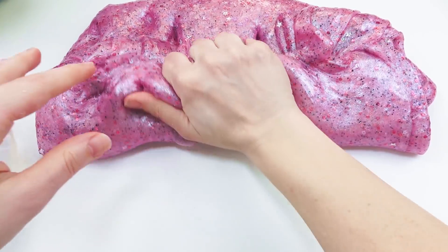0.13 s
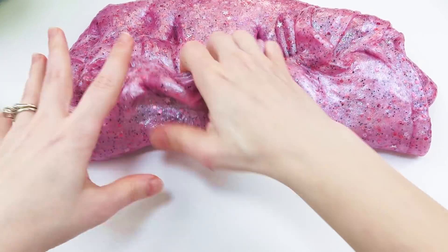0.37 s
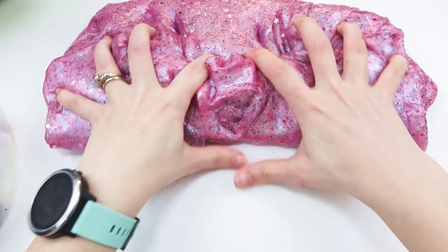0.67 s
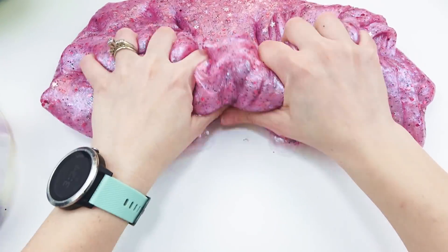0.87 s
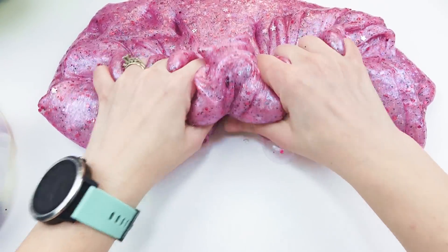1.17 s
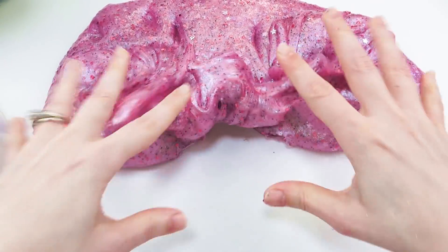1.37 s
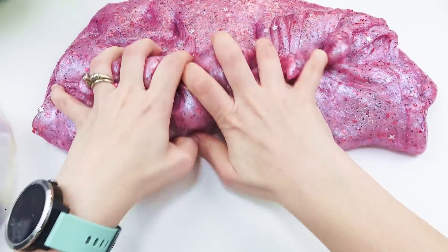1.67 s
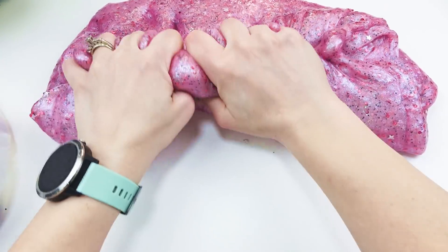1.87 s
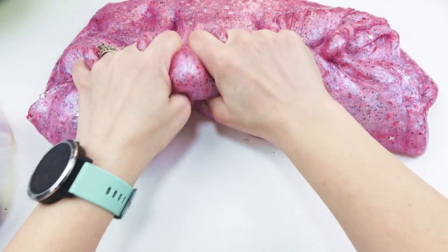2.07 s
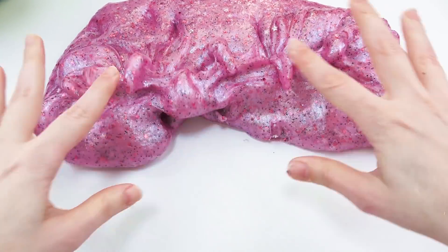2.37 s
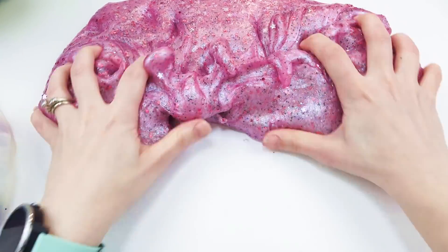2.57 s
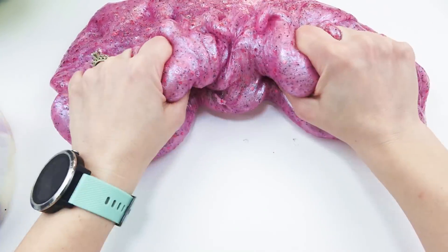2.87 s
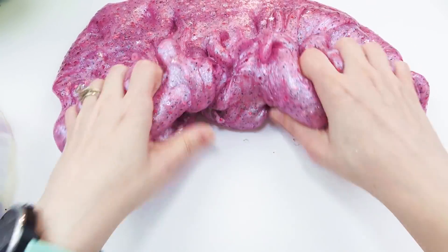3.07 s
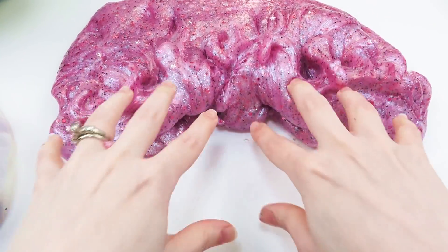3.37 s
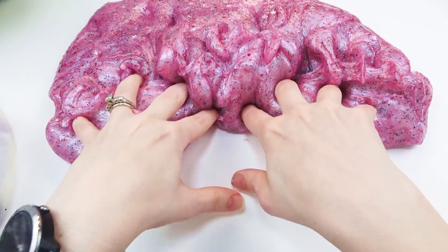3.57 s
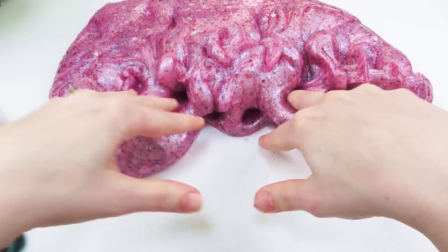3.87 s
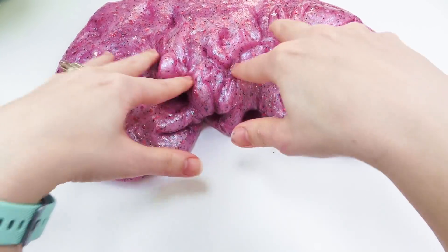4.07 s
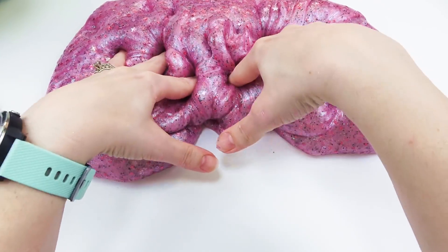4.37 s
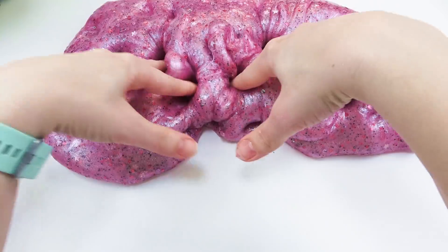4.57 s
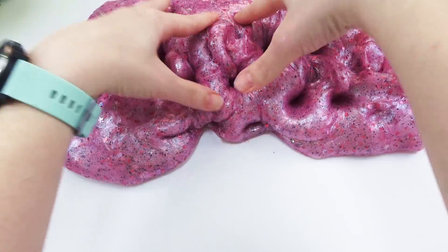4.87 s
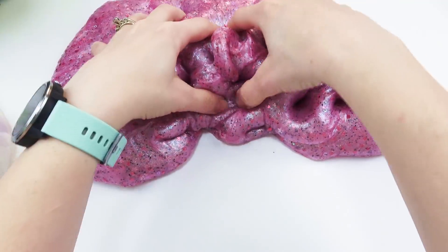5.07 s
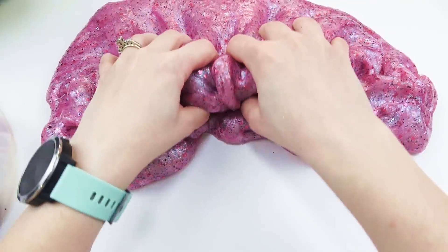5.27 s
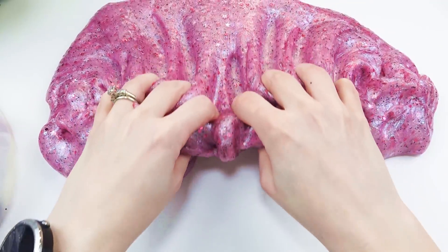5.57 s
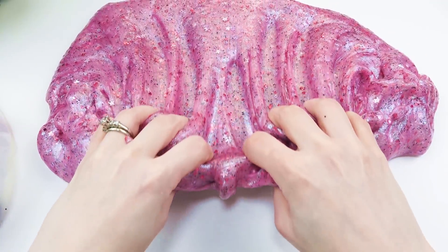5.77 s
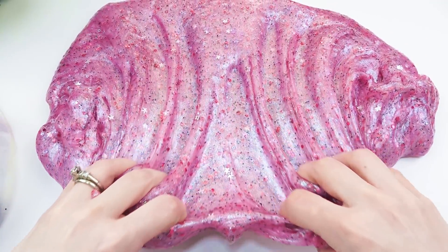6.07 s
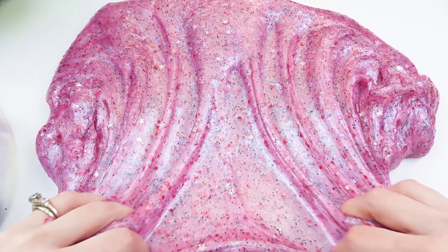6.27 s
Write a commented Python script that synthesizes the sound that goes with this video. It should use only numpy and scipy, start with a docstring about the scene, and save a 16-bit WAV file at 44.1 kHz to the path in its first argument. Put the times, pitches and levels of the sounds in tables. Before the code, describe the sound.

Close stereo microphone, small room with a very short reverberation; a low fan rumble, faint hiss and wavering mains hum continue throughout. At 0.15 s a strong hollow bubble pop bursts with a small air squirt and soft table thud, followed by tiny bright clicks and a sticky crackle near 0.4 s. From 0.7 to 2.3 s, short peeling crackles come and go, with a sharp tick near 0.97, a wet pop and fluttering squirt at 1.7 and dull palm bumps. A crisp pop hits at 2.67; gooey crackling and a squirt follow at 3.1-3.25. A bright, loud snap at 3.59 leads to the strongest cluster of snaps and crackle at 3.88-3.97. Another pop group and thud come at 4.63-4.67. Afterwards there are sparse light clicks, faint crackling around 5.2-5.5, a small pop at 5.97 and near quiet until 6.4.

```python
"""In a small room, two hands knead thick slime on a table, close to a stereo microphone.
Trapped air bubbles burst as damped cavity rings with noisy film snaps, and folds squirt as fluttering air.
The sticky skin crackles as it peels off the fingers: random ruptures and swarms of tiny ringing cells.
Soft pushes ring the table's decaying low modes; behind run filtered fan noise and wavering hum tones."""
import sys
import numpy as np
from scipy import signal
from scipy.fft import rfft, irfft, next_fast_len
from scipy.io import wavfile
from scipy.ndimage import uniform_filter1d

SR = 44100
rng = np.random.default_rng(int(sys.argv[2]) if len(sys.argv) > 2 else 0)


def to_wav(s):
    """Save 16-bit WAV."""
    ch = np.atleast_2d(s).T  # columns
    pcm = np.round(np.clip(ch, -1, 1) * 32767)  # PCM
    wavfile.write(sys.argv[1], SR, pcm.astype(np.int16))


N = 284004
TIME = np.arange(N) / SR

# larger bursting bubbles: (time [s], relative level [dB], cavity pitch [Hz],
# relative level of the film's snap [dB], left minus right [dB])
POPS = [(0.1448, 3, 1105, -30.5, 1.5), (0.1446, -7, 530, -53, 0), (.2302, -24.5, 1980, -28, 4),
        (.2838, -14, 9700, -53, -3.5), (0.2858, -17.5, 10800, -54, 2), (0.4034, -29, 10500, -33, 5),
        (.423, -25, 1240, -55, 0), (.6629, -30, 11200, -37.5, 4), (.686, -31, 2250, -44.5, 1),
        (.7398, -29.5, 2680, -53, 1), (.7538, -27.5, 10430, -43, 7), (0.9656, -26, 12100, -30.5, -1),
        (0.97, -14, 12420, -53, 0), (1.0091, -23, 6840, -34.5, -1), (1.2633, -21, 2930, -45, 2),
        (1.6813, -15.5, 3070, -26, 3.5), (1.9384, -26, 4470, -41, 0), (2.0405, -36.5, 4470, -54, 0),
        (2.672, -9, 6300, -23, 2.5), (3.124, -20.5, 686, -50, 1), (3.1508, -31, 9000, -36, 5),
        (3.263, -29, 12000, -43, 3), (3.54, -37.5, 1620, -53, 3), (3.56, -41, 1470, -45, 1.5),
        (3.588, -0.5, 11200, -48, 3), (3.5878, -8, 9600, -51, 0.5), (3.5883, -25.5, 3380, -61, 0),
        (3.7194, -41, 12000, -54, 4), (3.8756, -22, 9250, -31.5, 2.5), (3.89, 2.5, 9600, -13.5, 4.5),
        (3.8901, -12, 4040, -44, -5), (3.9333, -10, 10940, -23, 3), (3.942, -9.5, 10000, -20.5, 1),
        (3.9437, -14, 10400, -21, 2), (3.9672, -38, 810, -44, 0), (4.2915, -26, 14040, -65, -1),
        (4.6295, -13, 8510, -32.5, 5), (4.631, -15.5, 6340, -23, 0), (4.6427, -27.5, 7650, -29, -2),
        (4.9471, -18, 13780, -46.5, 3), (5.136, -21, 7270, -50, 1.5), (5.1417, -19.5, 6800, -37, 0),
        (5.1557, -22, 11500, -39, 8), (5.2503, -35, 1490, -52, 3), (5.2665, -38, 12000, -50, 5),
        (5.449, -33.5, 6800, -53.5, 2), (5.5626, -28, 8610, -51, 4.5), (5.5911, -19, 6150, -33, 2),
        (5.7977, -28, 11210, -57, 3.5), (5.9736, -17.5, 2890, -34, 2.5), (5.974, -23.5, 1101, -54, 2),
        (6.133, -46, 5480, -51, 3), (6.2643, -43, 1600, -51, 0), (6.4082, -30.5, 4770, -48.5, 5)]
# air forced out through a fold: (time [s], length [s], relative level [dB], pitch of the fold [Hz])
SQUIRTS = [(.148, 0.0079, -46, 850), (.2315, 0.013, -47.5, 13000), (1.689, 0.012, -37, 3500),
           (1.699, 0.019, -38, 2300), (3.124, 0.015, -48.5, 1860), (3.143, 0.016, -51, 15000),
           (4.672, 0.016, -50, 333), (3.964, 0.0074, -44.5, 1630), (.906, 0.01, -55.5, 5600),
           (3.1, 0.026, -66.5, 4200), (2.683, 0.006, -58, 6700)]
# palms load or release the table: (time [s], relative level [dB])
THUDS = [(0.1451, -43.5), (0.214, -54), (0.406, -45.5), (0.736, -39.5), (1.368, -41.5), (1.686, -39),
         (2.248, -41.5), (2.309, -44), (3.148, -37.5), (3.271, -42), (3.88, -38.5), (3.973, -36.5),
         (4.673, -33.5)]
# a hand grips, drags or lifts and the slime peels: (time [s], length [s], relative crackle level [dB],
# fade over the length [dB], large cells relative to small [dB], fine threads relative to small cells [dB])
PEELS = [(0.146, 0.029, -60, -1, 6, 3), (0.242, .012, -56.5, 11, 4, 2), (0.293, .03, -72, 6, -4, 12),
         (0.394, .11, -53, 11.5, -5, 3.5), (0.739, 0.086, -65.5, 0, -2, -0.5),
         (0.859, 0.2, -60, 1.5, -7, 1), (1.272, .17, -51, 5.5, -5.5, 0), (1.717, 0.04, -57.5, 5, 2, -6),
         (1.801, 0.22, -70, -0.5, -9, 4), (1.932, .02, -60, 0.5, -9, -1), (2.198, 0.035, -59, -4, -2.5, 4),
         (2.246, 0.079, -50.5, 3, -4.5, 1.5), (2.508, 0.01, -64.5, -4.5, -0.5, 5),
         (2.708, 0.071, -65, 0, -9, 2), (2.782, .07, -58.5, 2, -13, -2.5), (2.898, .08, -74, 6, -6, 1),
         (3.126, .06, -49, 3.5, -4, -2.5), (3.209, 0.035, -52.5, 3.5, -5, 3.5),
         (3.901, 0.071, -50, 2, -2, 0.5), (4.632, 0.042, -56, -2.5, 0, 4), (5.15, 0.11, -71, 12, 0.5, 9.5),
         (5.269, 0.29, -73, 6, 1.5, 2), (5.593, 0.022, -69, 0.5, -6, 6), (6.384, 0.058, -67.5, -1, -2, 4.5)]
# resonant modes of the table: (frequency [Hz], relative level [dB], 60 dB decay time [s])
TABLE_MODES = [(86.5, -1.5, 0.13), (98.2, -1, .25), (136, -4.5, 0.11), (239, -6.5, 0.1), (288, -8.5, .1)]
# mains hum and motor tones: (frequency [Hz], rms level [dB], waver [dB])
HUM_TONES = [(60, -53.5, 2.8), (121, -68, 1.5), (175.3, -77.5, 6), (180.1, -66, 0.9), (302, -78, 2.5),
             (311, -78, 3), (327.6, -80, 1), (357, -83.5, 3.5), (11850, -92, 2.5)]
# spectrum of the snapping film: (frequency [Hz], relative level [dB])
SNAP_SPECTRUM = [(150, -4.5), (400, -1), (1000, -8), (4000, -1), (11000, -1.5), (16000, -8)]
# spectrum of the tearing large cells: (frequency [Hz], relative level [dB])
LARGE_CELL_SPECTRUM = [(120, -14), (300, -8), (600, 5), (1300, 4), (1900, -21.5), (3000, -38.5)]
# spectrum of the tearing small cells: (frequency [Hz], relative level [dB])
SMALL_CELL_SPECTRUM = [(700, -27.5), (1500, -6.5), (2500, -0.5), (4500, -3), (6000, -3), (9000, -32.5)]
# spectrum of the tearing threads: (frequency [Hz], relative level [dB])
THREAD_SPECTRUM = [(3500, -27), (6000, -7), (9500, 6.5), (12000, 5.5), (14000, 3), (16000, -9.5)]
# spectrum of the fan: (frequency [Hz], relative level [dB])
FAN_SPECTRUM = [(15, -8.5), (38, 7), (54, 3.5), (70, -13.5), (94, 1), (120, -6.5), (165, -9), (205, -13.5),
                (278, -13.5), (340, -20.5), (470, -17.5), (1000, -24), (1600, -30), (2000, -29),
                (2600, -37), (4000, -43), (12000, -47.5), (16000, -55)]
# modes of the pocket behind a fold: (ratio to the fold's pitch [1], relative level [dB])
POCKET_MODES = [(.15, -5), (.4, -9.5), (1, 4.5), (1.65, 6.5)]
# early reflections and the two parts of the room's tail: (frequency [Hz], relative level [dB])
EARLY_SPECTRUM = [(200, 3), (1200, -5.0), (4000, -2.0), (16000, 1.5)]
LOW_TAIL_SPECTRUM = [(300, 4.0), (1500, 3.0), (6000, -15.5), (12000, -30.5)]
HIGH_TAIL_SPECTRUM = [(800, -11), (3500, 4.5), (11000, 1.5), (16000, 3.5)]
# left-right difference of the room and of the fan: (frequency [Hz], relative level [dB])
ROOM_SIDE = [(500, -18.5), (2000, -16), (4500, -2.5), (8000, 2.5)]
FAN_SIDE = [(60, -4.5), (400, -10), (2000, -6.5), (8000, 2.5)]

ROOM_T60_S, ROOM_TREBLE_T60_S = 0.23, 0.24
TOP_HZ = 16200
# a pocket's decay constant is RING_CYCLES at RING_HZ; higher pockets ring for more cycles
RING_CYCLES, RING_HZ, RING_GROWTH = 0.84, 3000, 0.19
GRIP_DB_PER_S, LET_GO_DB_PER_S = 452, 376  # how fast a peel swells and dies
CLING_DB = -83.5  # relative floor: the slime never lies quite still
# small bubbles in a peel: rate, relative level in a peel of TINY_REFERENCE_DB,
# and the share of the peel's level that they follow
TINY_PER_S, TINY_DB, TINY_REFERENCE_DB, TINY_FOLLOW = 22, -46, -60, 0.94


def undb(db):
    """Logarithmic level: decibels become an amplitude gain."""
    return 10 ** (np.asarray(db) / 20)


def unit(x):
    """Normalization by power: scale to rms 1."""
    return x / np.sqrt(np.mean(x ** 2))


def colour(x, points):
    """Minimum-phase filtering: a folded cepstrum gives a causal filter through (Hz, dB) points."""
    hz, db = np.transpose(points)
    size = next_fast_len(x.shape[-1] + 4096)
    size += size % 2
    bins_hz = np.fft.rfftfreq(size, 1 / SR)
    log_gain = np.log(undb(np.interp(np.log(bins_hz + 1), np.log(hz), db)))
    cepstrum = irfft(log_gain)
    cepstrum[1:size // 2] *= 2
    cepstrum[size // 2 + 1:] = 0
    response = np.exp(rfft(cepstrum))
    return irfft(rfft(x, size) * response)[..., :x.shape[-1]]


def add(out, s, sound):
    """Superposition: mix a short sound in at time s."""
    i = int(s * SR)
    out[..., i:i + sound.shape[-1]] += sound[..., :N - i]


def pan(db):
    """Interchannel level difference: left and right gains, left minus right in dB."""
    return undb(np.array([[db], [-db]]) / 2)


def ports(x, lag_us):
    """Interchannel delay: the sound reaches the right microphone port a little after the left."""
    left, right = np.broadcast_to(x, (2, N))
    size = next_fast_len(N + 64)
    turn = np.exp(-2j * np.pi * np.fft.rfftfreq(size, 1 / SR) * lag_us / 10 ** 6)
    return np.array([left, irfft(rfft(right, size) * turn, size)[:N]])


def spread(noises, side):
    """Mid-side stereo: two unrelated sounds make left and right alike in the bass, apart in the treble."""
    return noises[0] + np.array([[1], [-1]]) * colour(noises[1], side)


def walk(rate):
    """Low-passed randomness: a twice-smoothed drift with a spread near 1, rate in steps per second."""
    k = int(SR / rate)
    steps = np.repeat(rng.standard_normal(N // k + 1), k)
    return 1.3 * uniform_filter1d(uniform_filter1d(steps, k), k)[:N]


def clicks(size, per_s, spread_db):
    """Random point process: tiny ruptures at random moments, many weak and a few strong."""
    happens = rng.random(size) < per_s / SR
    strength = undb(spread_db * np.minimum(rng.exponential(size=size), 5))
    return happens * rng.choice([-1, 1], size) * strength


def background(fan_db=-56):
    """Broadband and tonal noise: a fan's rumble and hiss, and a mains hum that wavers."""
    air = spread(rng.standard_normal((2, N)), FAN_SIDE)
    fan = undb(fan_db + 0.54 * walk(3)) * unit(colour(air, FAN_SPECTRUM))
    hum = 0
    for hz, db, waver_db in HUM_TONES:
        amplitude = np.sqrt(2) * undb(db + waver_db * walk(6.4))
        phase = 2 * np.pi * (hz * TIME + rng.random()) + 0.17 * walk(5.4)
        hum = hum + amplitude * np.sin(phase)
    return pan(-0.65) * fan + pan(-5.5) * hum


def room(x, early_db=-7, late_db=-12.5, early_s=0.012):
    """Reverberation: scattered reflections off the table and arms, then the room's short decaying tail."""
    t = TIME[:SR // 2]
    arrival = np.clip((t - .0006) / 0.0017, 0, 1)
    early = colour(rng.standard_normal((2, len(t))), EARLY_SPECTRUM) * np.exp(-t / early_s) * arrival
    low = colour(rng.standard_normal((2, len(t))), LOW_TAIL_SPECTRUM) * undb(-60 * t / ROOM_T60_S)
    high = colour(rng.standard_normal((2, len(t))), HIGH_TAIL_SPECTRUM) * undb(-60 * t / ROOM_TREBLE_T60_S)
    late = (low + high) * arrival
    response = (undb(early_db) * unit(early) + undb(late_db) * unit(late)) / np.sqrt(len(t))
    response = spread(response, ROOM_SIDE)
    return signal.fftconvolve(x.mean(0)[None], response, axes=1)[:, :N]


def thuds(push_s=0.012):
    """Modal excitation: a soft push through the slime rings the table's low modes."""
    out, t = np.zeros(N), TIME[:SR // 3]
    for s, db in THUDS:
        ring = 0
        for hz, mode_db, t60 in TABLE_MODES:
            mode_hz = hz * (1 + 0.018 * rng.standard_normal())
            ring = ring + undb(mode_db - 60 * t / t60) * np.sin(2 * np.pi * mode_hz * t)
        add(out, s, undb(db) * ring * (1 - np.exp(-t / push_s)))
    return pan(-1.5) * out


def cavity(t, hz, cycles, open_cycles=0.44, sluggish_hz=300):
    """Damped resonance: an air pocket opens, the slower the larger it is, and the slime damps its ring."""
    opening = 1 - np.exp(-(hz * t / (open_cycles + sluggish_hz / hz)) ** 2)
    return np.sin(2 * np.pi * hz * t) * np.exp(-hz * t / cycles) * opening


def ring_cycles(hz):
    """Frequency-dependent damping: the decay constant in cycles grows with a pocket's pitch."""
    return RING_CYCLES * (hz / RING_HZ) ** RING_GROWTH


def pull():
    """Swelling and release: each peel swells, holds on a fading level and lets go; powers add up.
    Returns the gains of large cells, small cells and threads."""
    power = np.full((3, N), undb(CLING_DB) ** 2)
    for s, length, db, fade_db, large_db, fine_db in PEELS:
        age = TIME - s
        swell_db = GRIP_DB_PER_S * np.minimum(age, 0)
        hold_db = -fade_db * np.clip(age / length, 0, 1)
        release_db = -LET_GO_DB_PER_S * np.maximum(age - length, 0)
        shape_db = swell_db + hold_db + release_db
        near = shape_db > -60
        power[:, near] += (undb([[large_db], [0], [fine_db]]) * undb(db + shape_db[near])) ** 2
    return np.sqrt(power)


def cells(low_hz, high_hz, per_s, cycles):
    """Superposed resonators: a swarm of tiny air cells bursts, each ringing at its own pitch."""
    t = TIME[:int(5 * cycles / low_hz * SR)]
    when, pitch, damping, strength = rng.random((int(per_s * N / SR), 4)).T[:, :, None]
    hz = low_hz * (high_hz / low_hz) ** pitch
    size = undb(-3.7 * np.log(np.maximum(strength, .03))) * np.sqrt(hz)
    grains = size * cavity(t, hz, cycles * (.5 + damping))
    places = (when * N).astype(int) + np.arange(len(t))
    return unit(np.bincount(places.ravel(), grains.ravel(), N)[:N])


def peeling(peel_db=-3.5, patchy_db=2.5, ringing_db=0):
    """Adhesive rupture: under each hand countless cells and threads tear, letting go in uneven patches."""
    gains = pull()
    out = 0
    for lag_us, pan_db in [(42, 1), (6, 1.5)]:  # one pass for each hand
        tears = unit(clicks(N, per_s=1500, spread_db=3.0))  # shared by the hand's three swarms
        swarms = [(LARGE_CELL_SPECTRUM, cells(low_hz=383, high_hz=1500, per_s=250, cycles=2.6)),
                  (SMALL_CELL_SPECTRUM, cells(low_hz=1696, high_hz=6300, per_s=450, cycles=2.8)),
                  (THREAD_SPECTRUM, cells(low_hz=5800, high_hz=13700, per_s=900, cycles=3.3))]
        hand = 0
        for gain, (spectrum, ringing) in zip(gains, swarms):
            own_tears = unit(clicks(N, per_s=3600, spread_db=1.0))
            tearing = unit(colour(tears + own_tears, spectrum))
            hand = hand + gain * unit(tearing + undb(ringing_db) * ringing)
        patches = undb(peel_db + patchy_db * walk(70))
        out = out + ports(pan(pan_db) * hand * patches, lag_us)
    return out / np.sqrt(2)


def squirts(body_db=0, squirt_db=-5):
    """Flow-driven resonance: a fold's lips flutter in escaping air and ring the pocket behind them."""
    out, t = np.zeros(N), TIME[:SR // 200]
    for s, length, db, hz in SQUIRTS:
        age = TIME[:int(2 * length * SR)] / length
        envelope = np.minimum(age * 6, 1) / (1 + age ** 6)
        flutter = clicks(len(age), per_s=8900, spread_db=1.5) * envelope
        pocket = 0
        for ratio, mode_db in POCKET_MODES:
            pocket = pocket + undb(mode_db) * cavity(t, min(hz * ratio, SR / 3), 0.54)
        ringing = unit(signal.fftconvolve(flutter, pocket)[:len(age)])
        rush_spectrum = [(hz / 8, -7), (hz, 0), (hz * 2.1, -2), (hz * 4.4, -8), (hz * 6, -20)]
        rush = unit(colour(flutter, rush_spectrum))
        add(out, s, undb(db + squirt_db) * (ringing + undb(body_db) * rush))
    return ports(pan(0.89) * out, lag_us=22.5)


def tiny_pops(low_hz=1300, high_hz=11000, cycles=2.54, scatter_db=3, pan_scatter_db=3):
    """Random cavity bursts: small bubbles pop while the slime peels, louder under a harder pull."""
    out, t = np.zeros((2, N)), TIME[:SR // 80]
    for s, length, db, *_ in PEELS:
        for happens, when, pitch, size, side in rng.random((16, 5)):  # 16 chances in each peel
            if happens < TINY_PER_S * length / 16:
                follow_db = TINY_FOLLOW * (db - TINY_REFERENCE_DB)
                level_db = TINY_DB + follow_db + scatter_db * (2 * size - 1)
                ring = cavity(t, low_hz * (high_hz / low_hz) ** pitch, cycles)
                gains = undb(level_db) * pan(pan_scatter_db * (2 * side - 1))
                add(out, min(s + when * length, TIME[-1]), gains * ring)
    return ports(out, lag_us=24)


def pops(snap_s=0.0014, snap_db=-5, step_cycles=3.6, step_db=-7, step_spread=.1, ring_db=-1):
    """Impulsive cavity resonance: a film snaps and rips open in three weakening steps, ringing at each.
    The larger the bubble, the slower the steps."""
    t = TIME[:SR // 40]
    rings, snaps = np.zeros((2, 2, N))
    for s, db, hz, film_db, pan_db in POPS:
        delays, detunes = rng.uniform(.5, 1.5, 2), rng.uniform(-1, 1, 2)
        steps = zip([0, *np.cumsum(delays)], [0, *detunes])
        for k, (late, detune) in enumerate(steps):
            pitch = min(hz * (1 + step_spread * detune), SR / 3)
            gains = undb(db + ring_db + k * step_db) * pan(pan_db)
            add(rings, s + step_cycles * late / hz, gains * cavity(t, pitch, ring_cycles(hz)))
        snap = rng.standard_normal(len(t)) * np.exp(-t / snap_s)
        add(snaps, s, undb(film_db + snap_db) * pan(pan_db) * snap)
    return ports(rings + colour(snaps, SNAP_SPECTRUM), lag_us=17.6)


def scene():
    """Superposition of sources: slime with its room sound, table thuds and steady background."""
    slime = pops() + tiny_pops() + squirts() + peeling()
    return slime + room(slime) + thuds() + background()


def record(dry):
    """Band limitation: the recorder cuts the top with a steep elliptic low-pass."""
    return signal.sosfilt(signal.ellip(8, .2, 70, TOP_HZ, fs=SR, output="sos"), dry)


dry = scene()
out = record(dry)
to_wav(out)
```